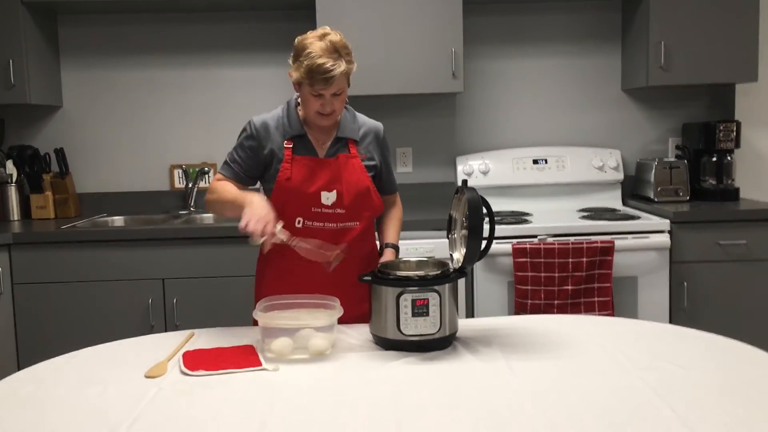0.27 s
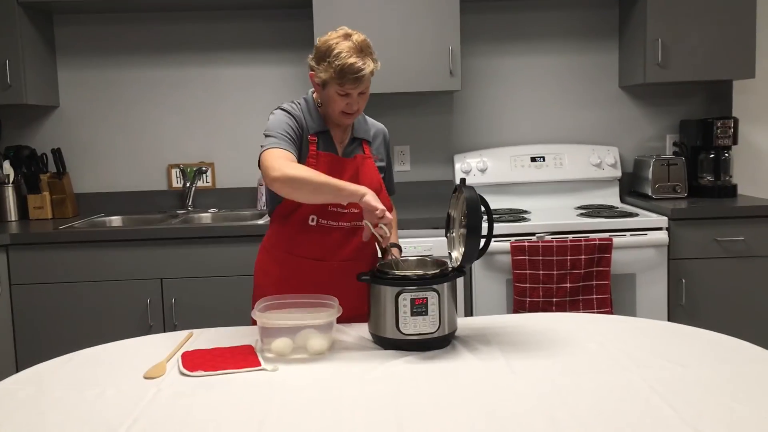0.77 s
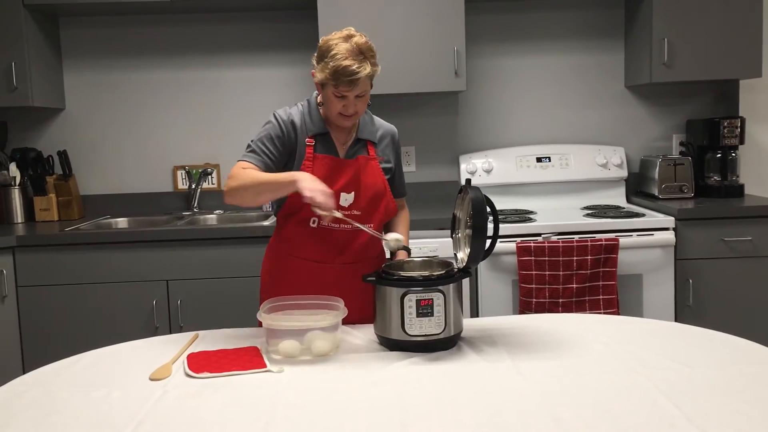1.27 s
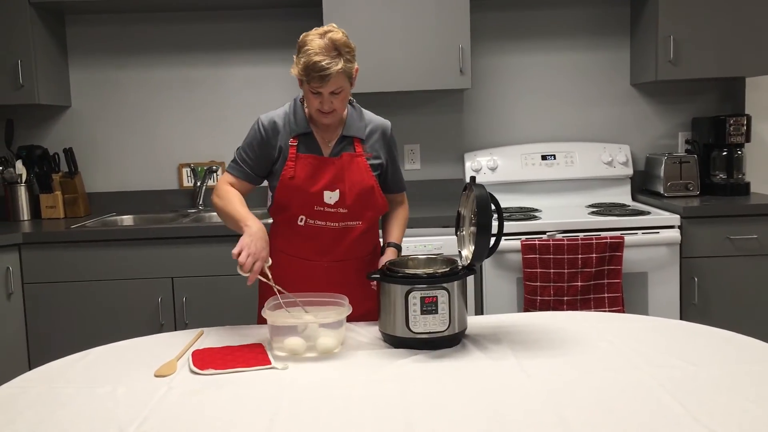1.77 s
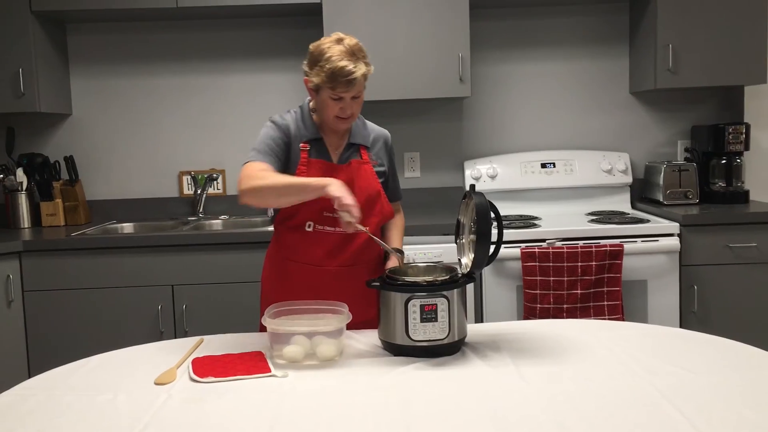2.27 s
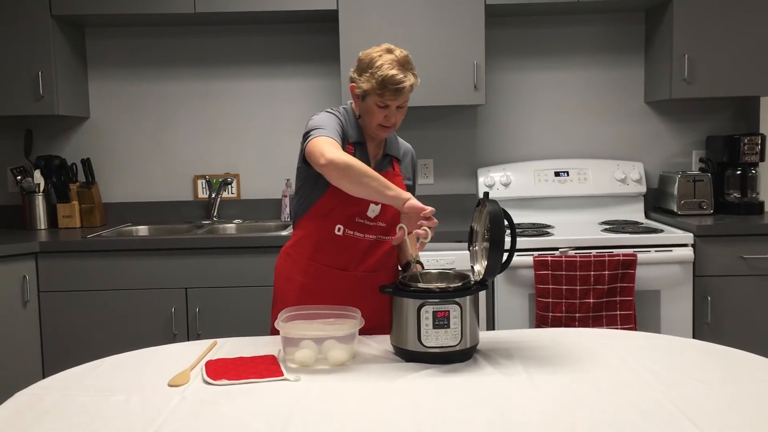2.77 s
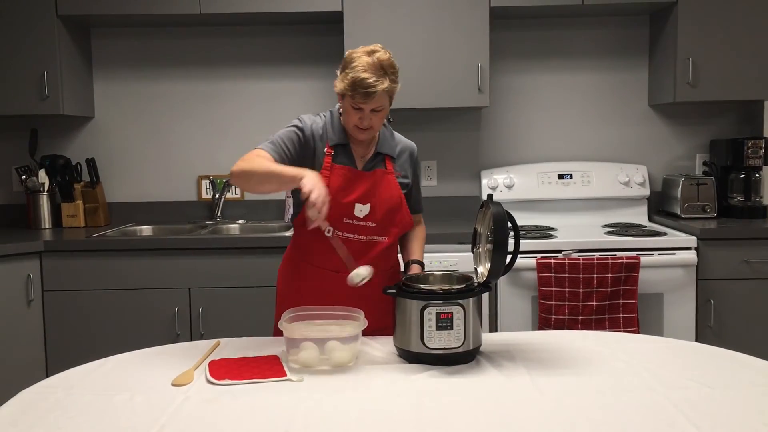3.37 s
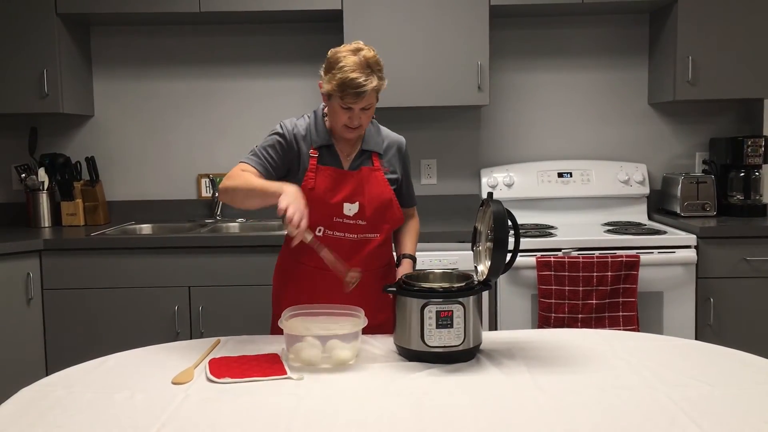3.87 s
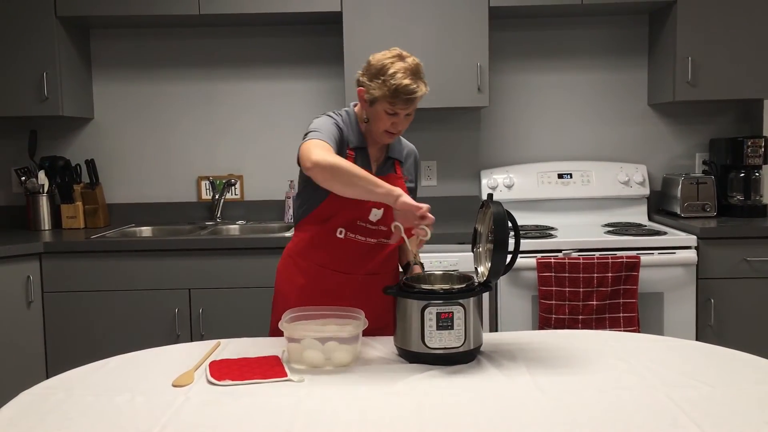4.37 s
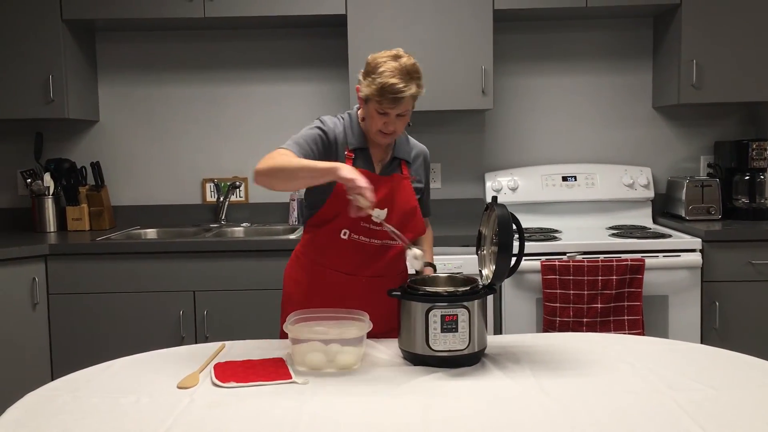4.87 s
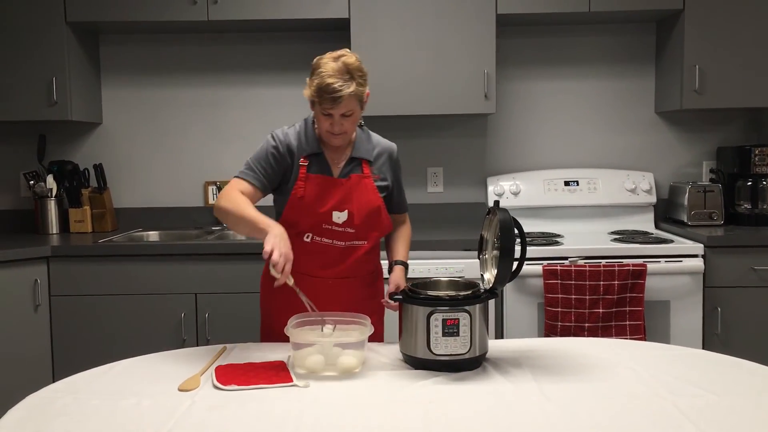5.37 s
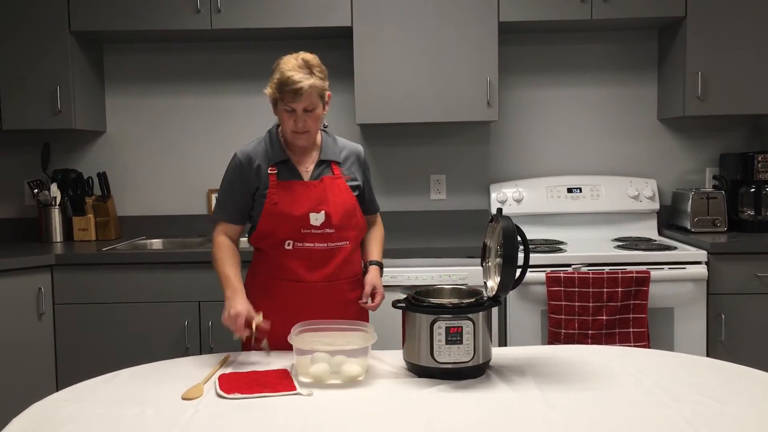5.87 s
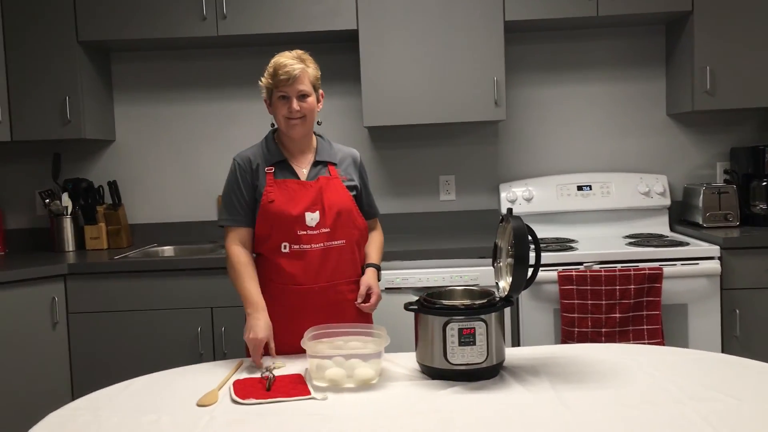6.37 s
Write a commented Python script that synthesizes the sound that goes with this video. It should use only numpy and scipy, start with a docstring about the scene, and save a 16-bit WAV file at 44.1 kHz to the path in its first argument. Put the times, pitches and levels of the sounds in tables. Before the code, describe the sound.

In a small kitchen, steel tongs scrape and clink against a thin metal pot, with faint squeaks as they grip eggs. Each egg lands in a plastic tub of water with a soft knock and a low thump from the table. After several transfers, the tongs snap shut with a loud, bright click and are set down with a knock and a brief rattle. Ventilation and appliances hum steadily underneath.

```python
"""A small humming kitchen: steel tongs lift boiled eggs from a pot into a plastic tub of cold water.
The tongs scrape and clink on the pot's thin wall, tick on the shells and squeak faintly as they grip.
Each egg knocks on the tub's floor and makes the table boom. At last the tongs snap shut and are
laid on the table with a knock and a rattle. Ventilation and appliance motors drone underneath."""
import sys
import numpy as np
from scipy import signal
from scipy.fft import rfft, irfft, next_fast_len
from scipy.io import wavfile

SR = 44100
rng = np.random.default_rng(int(sys.argv[2]) if len(sys.argv) > 2 else 0)


def log_audio(samples):
    """Write samples as a 16-bit WAV file to the path given in sys.argv[1]."""
    # one column per channel
    frames = np.atleast_2d(samples).T
    # limit to full scale, then quantise
    limited = np.clip(frames, -1, 1)
    pcm = np.round(limited * 32767).astype(np.int16)
    wavfile.write(sys.argv[1], SR, pcm)


N = 291942
SIZE = 32768  # samples in one contact sound
AGE = np.arange(SIZE) / SR  # seconds since the contact
HZ = np.fft.rfftfreq(SIZE, 1 / SR)

# the tongs landing and bouncing on the table: start_s, level_db
TABLE_KNOCKS = [(6.07, -42.5), (6.4601, -9), (6.4655, -26), (6.4808, -26), (6.4896, -21)]


def pot():
    """Tongs hit the pot and skid, tiny slips keeping it clanging, and once an egg knocks dully on the pot's
    floor; hard hits are brighter and ring more."""
    # hits, one cluster for each egg, the first a dull knock of an egg on the pot's floor: start_s, level_db,
    # skid_s, floor_ring_db
    hits = [(0.7392, -36.5, 0.0032, 9.5), (.747, -33, 0.025, 0.5), (0.825, -39, 0.019, -6),
            (.872, -41.5, 0.028, -8.5), (.933, -32, 0.0071, -3.5), (.962, -27.5, 0.0034, -2.5),
            (1.032, -28.5, 0.018, 0.5), (2.591, -50.5, 0.013, 8), (2.628, -55, 0.023, 10),
            (2.684, -19.5, 0.0041, -5), (2.695, -28.5, 0.02, 4.5), (2.845, -43, .02, 7.5),
            (2.879, -43.5, 0.014, 5.5), (3.007, -49.5, 0.011, 3.5), (4.461, -41.5, 0.024, 4.5)]
    # tone of the wall's dense clang: freq_hz, gain_db
    wall_eq = [(150, -12.5), (300, 2), (400, -17), (570, -4.5), (800, -10.5), (1900, -12), (2450, -3.5),
               (2850, -3.5), (3250, -3), (3750, -4), (4700, -4.5), (5600, 1.5), (6600, -5), (8600, 1),
               (11400, -8.5), (15500, -5.5)]
    # the pot's lasting modes: pitch_hz, level_db, t60_s
    modes = [(570, -9, .25), (975, -14, .4), (1310, -15, .25), (1490, -14, .3), (1733, -9, .35),
             (2912, -11, .3), (3165, -4, .2), (3381, -3, .22), (4307, -17, .3), (5469, 1, .2),
             (5588, -2, .18), (6072, -4, .24), (6950, -7, .25), (7165, 0, .17), (7430, 1, .16),
             (7842, -2, .17), (8200, 2, .16), (8970, 0, .17), (9421, -6, .18), (9835, -4, .15),
             (11335, -3, .13), (11482, 0, .15)]
    # where the pot's floor rings: freq_hz, share of floor_ring_db
    floor_shape = [(200, 0), (550, 1), (1600, 1.5), (2400, 1.05), (3500, 0.48), (6000, 0)]
    neutral_db, slips_per_s = -24.5, 1500  # a hit at the neutral level gets no treble tilt
    track = np.zeros(N)
    for start_s, level_db, skid_s, floor_ring_db in hits:
        force_db = level_db - neutral_db
        grip = (1 - fade(AGE, 0.45 * skid_s)) * fade(np.maximum(AGE - skid_s, 0), 0.041)
        slips = rng.standard_normal(SIZE) * (rng.random(SIZE) < slips_per_s / SR) * grip
        slips[0] = 3.2 * amp(0.4 * force_db)  # the first touch sharpens with force
        slip_tick = amp(-10) * packet(signal.unit_impulse(SIZE))
        wall = steel_wall(t60=0.054, count=1300) + slip_tick
        scrape = packet(colour(signal.fftconvolve(slips, wall)[:SIZE], along(wall_eq, HZ)))
        clang = scrape + amp(-10 + 0.16 * force_db) * ring(modes)
        contact_db = tilt(0.16 * force_db, pivot_hz=8200) + floor_ring_db * along(floor_shape, HZ)
        gain = amp(level_db + 0.5) * np.sqrt(1 + skid_s / 0.0032)  # longer skids carry more energy
        add(track, start_s, gain * kitchen(colour(clang, contact_db), wet_db=-4.5))
    return track


def steel_wall(t60, count):
    """Thin steel rings in a crowd of overlapping modes at random pitches and strengths."""
    lines = np.zeros(len(HZ), complex)
    strengths = rng.standard_normal(count) * np.exp(2j * np.pi * rng.random(count))
    lines[rng.integers(1, len(HZ), count)] = strengths
    return packet(irfft(lines) * fade(AGE, t60))


def eggs():
    """An egg ticks and knocks on the tub's floor; the weight of the water then rocks the table top."""
    # eggs landing: start_s, level_db, table_boom_db, tub_ring_db
    drops = [(0.3825, -34, -41.5, -5), (2.1773, -35, -38.5, -3), (3.902, -41.5, -55, -6),
             (3.963, -31, -41.5, -12), (5.653, -32.5, -36, -1.5)]
    # tone of the water-filled tub: freq_hz, gain_db
    tub_eq = [(100, -25), (250, 3), (450, -1), (680, 6.5), (1000, 1), (1500, -1.5), (2200, -9),
              (3000, -16.5), (4000, -21), (8000, -28), (15000, -49)]
    # the tub's modes: pitch_hz, level_db, t60_s
    modes = [(295, -3, .2), (660, 0, .2), (904, -5, .14), (1220, -9, .12), (1420, -8, .1)]
    tick_eq = [(800, -15), (4200, 6), (6000, -4), (14000, -18)]  # freq_hz, gain_db
    boom = np.sin(2 * np.pi * 82 * AGE) * fade(AGE, 0.37) * (1 - fade(AGE, 0.16)) ** 2
    track = np.zeros(N)
    for start_s, level_db, boom_db, ring_db in drops:
        tick = amp(-17.5) * impact(along(tick_eq, HZ), shudder_db=-1, t60=0.0083)
        knock = impact(along(tub_eq, HZ), shudder_db=9, t60=0.075) + amp(ring_db) * ring(modes)
        landing = amp(level_db + 4.5) * kitchen(tick + knock, wet_db=-9)
        add(track, start_s, landing + amp(boom_db + 10.5) * boom)
    return track


def tongs():
    """Squeezed by the hand or jolted by the table, the steel arms click: the harder, the brighter."""
    # the arms closing; the loud pair is the snap and its rebound: start_s, level_db
    clicks = [(1.929, -41.5), (4.901, -39), (4.94, -41), (5.643, -42), (5.8167, -8), (5.819, -14.5),
              (6.0953, -38.5), (6.411, -37.5), (6.4902, -28.5)]
    # tone of the thin steel arms: freq_hz, gain_db
    arm_eq = [(300, -19), (1500, -22.5), (2700, -17), (4200, -12), (5200, -17), (6300, -2.5), (7400, -8.5),
              (8700, -2), (10400, -10), (12000, 0.5), (14800, 11), (15700, 17.5), (16500, -27)]
    # the arms' modes: pitch_hz, level_db, t60_s
    modes = [(2767, -9, .2), (4576, -16, .16), (6105, -9, .17), (6690, -4, .16), (8500, -8, .15),
             (9415, -9, .18), (11800, -4, .17), (12380, -2, .2), (13250, 1, .22), (14200, -2, .19),
             (14590, -1, .18), (14988, 4, .22)]
    neutral_db = -8.5  # a click at this level gets no treble tilt
    # the arms clap together just after each knock on the table
    claps = [(knock_s + 0.0065, -20 + 0.49 * knock_db) for knock_s, knock_db in TABLE_KNOCKS]
    track = np.zeros(N)
    for start_s, level_db in clicks + claps:
        tone_db = along(arm_eq, HZ) + tilt(0.24 * (level_db - neutral_db), pivot_hz=12000)
        click = impact(tone_db, shudder_db=3, t60=0.036) + amp(-18) * ring(modes)
        add(track, start_s, amp(level_db + 0.5) * kitchen(click, wet_db=-8))
    return track


def table():
    """The handle of the tongs knocks on the covered table and bounces."""
    # tone of the table top: freq_hz, gain_db
    top_eq = [(35, -53), (90, -25), (180, -17), (350, -13), (560, -27), (760, -15), (930, 0.5), (1400, -1),
              (1750, -9.5), (2300, -17.5), (3100, -22), (4200, -37), (5500, -45), (12000, -50)]
    # the top's modes: pitch_hz, level_db, t60_s
    modes = [(100, -19, .35), (183, -7, .28), (290, -9, .22), (400, -14, .35), (660, -7, .25),
             (921, 1, .14), (1155, -7, .15), (1214, -3, .13), (1310, -1, .13), (1404, 1, .12),
             (1810, -14, .17)]
    track = np.zeros(N)
    for start_s, level_db in TABLE_KNOCKS:
        knock = impact(along(top_eq, HZ), shudder_db=-5, t60=0.06)
        body = amp(-7) * ring(modes, scatter_db=0)
        add(track, start_s, amp(level_db) * kitchen(knock + body, wet_db=-15))
    return track


def shell_grip():
    """Steel ticks on the shells and squeaks faintly under the grip."""
    # light taps on eggshell: start_s, level_db, pitch_hz
    taps = [(.233, -49.5, 3580), (3.669, -56, 3400), (3.807, -43.5, 3240), (3.810, -49, 3680),
            (5.06, -52, 4520)]
    # squeaks as an egg is gripped or carried: start_s, length_s, level_db, pitch_hz
    squeaks = [(0.744, 0.044, -31, 3250), (.83, 0.11, -42, 3165), (1.593, .06, -54, 1120),
               (3.234, 0.09, -54.5, 1116), (3.827, 0.059, -50, 1097), (4.943, 0.049, -43, 1110)]
    tick_eq = [(1000, -6), (4000, 6), (12000, -23)]  # freq_hz, gain_db
    track = np.zeros(N)
    for start_s, level_db, pitch_hz in taps:
        tick = impact(along(tick_eq, HZ), shudder_db=22, t60=0.0067)
        ping = ring([(pitch_hz, 0, 0.04)])
        add(track, start_s, amp(level_db) * kitchen(tick + ping, wet_db=-9.5))
    for start_s, length_s, level_db, pitch_hz in squeaks:
        swell = np.sin(np.pi * np.minimum(AGE / length_s, 1))
        phase_drift = 0.053 * np.cumsum(rng.standard_normal(SIZE))
        squeak = swell * np.sin(2 * np.pi * pitch_hz * AGE + phase_drift)
        add(track, start_s, amp(level_db) * kitchen(squeak, wet_db=-15))
    return track


def kitchen(x, wet_db):
    """Add the room's short reverb, new for every place of contact; the treble dies first."""
    # reverb time: freq_hz, t60_s
    decay = [(100, 1), (500, 0.34), (2000, 0.36), (7000, 0.24), (14000, 0.2)]
    hz, t, noise = signal.stft(rng.standard_normal(SIZE), SR, nperseg=256)
    dying = noise * fade(t, along(decay, hz)[:, None])
    tail = signal.istft(dying, SR, nperseg=256)[1][:SIZE] * (1 - fade(AGE, 0.039))
    return x + amp(wet_db) * signal.fftconvolve(x, tail / np.linalg.norm(tail))[:SIZE]


def room_tone():
    """Ventilation noise and the slightly wandering hum of appliance motors."""
    # tone of the ventilation and hiss: freq_hz, gain_db
    air_eq = [(15, -55), (25, -11), (50, -7), (80, -7.5), (123, -3), (157, -14), (211, -3.5), (342, -14),
              (414, -12), (449, -20), (1040, -23), (1120, -22), (1590, -28), (12400, -40.5), (15800, -29)]
    # motor tones: pitch_hz, level_db, width_hz, noise_share
    motors = [(118.2, -53, 1.4, 0.46), (131.8, -55.5, 3.7, 1), (207.2, -56, 3.16, 0.48),
              (539, -69, 2.3, 0.16), (708, -68, 0.7, 0.14), (898, -69, 2.8, 0.42), (1305, -73, 1.1, .2),
              (3563, -71.5, 28, 0.19), (6010, -75, 39, 0.46)]
    hz, t = np.fft.rfftfreq(N, 1 / SR), np.arange(N) / SR
    track = amp(-46) * shaped_noise(amp(along(air_eq, hz)))
    for pitch_hz, level_db, width_hz, noise_share in motors:
        waver = shaped_noise(1 / (1 + ((hz - pitch_hz) / (2 * width_hz)) ** 2))
        phase_drift = np.cumsum(rng.standard_normal(N)) * np.sqrt(width_hz / SR)
        hum = unit(np.sin(2 * np.pi * pitch_hz * t + phase_drift))
        track += amp(level_db) * (np.sqrt(noise_share) * waver + np.sqrt(1 - noise_share) * hum)
    return track


def impact(gain_db, shudder_db, t60):
    """One sharp push and the short shudder of many crowded modes."""
    push = packet(signal.unit_impulse(SIZE))
    shudder = packet(rng.standard_normal(SIZE) * fade(AGE, t60) * (1 - fade(AGE, 0.0023)))
    return packet(colour(push + amp(shudder_db) * shudder, gain_db))


def ring(modes, scatter_db=2):
    """Damped modes, struck at random phases with their levels scattered by scatter_db."""
    hz, db, t60 = np.transpose(modes)[:, :, None]
    gains = amp(db + scatter_db * rng.standard_normal(hz.shape))
    partials = gains * fade(AGE, t60) * np.sin(2 * np.pi * (hz * AGE + rng.random(hz.shape)))
    return packet(partials.sum(axis=0) * (1 - fade(AGE, 0.021)))


def colour(x, gain_db):
    """Minimum-phase EQ with the given gain at each of HZ."""
    cepstrum = irfft(np.log(amp(gain_db)))
    cepstrum[1:SIZE // 2] *= 2
    cepstrum[SIZE // 2 + 1:] = 0
    return signal.fftconvolve(x, irfft(np.exp(rfft(cepstrum))))[:SIZE]


def tilt(db_per_octave, pivot_hz):
    """Brightness tilt in dB, flat below 300 Hz."""
    return db_per_octave * np.log2(np.maximum(HZ, 300) / pivot_hz)


def shaped_noise(gains):
    """A scene-long bed of noise with the given spectrum, at rms 1."""
    return unit(irfft(rfft(rng.standard_normal(N)) * gains, N))


def along(points, hz):
    """Join (freq_hz, value) points on a log frequency axis."""
    freqs, values = np.transpose(points)
    return np.interp(np.log(hz + 1), np.log(freqs), values)


def fade(t, t60):
    """Exponential decay, 60 dB in t60 seconds; 1 - fade makes an attack."""
    return amp(-60 * t / np.maximum(t60, 1e-3))


def amp(db):
    """Decibels to gain."""
    return 10 ** (np.asarray(db) / 20)


def unit(x):
    """Scale to rms 1."""
    return x / np.sqrt(np.mean(np.abs(x) ** 2) + 1e-20)


def packet(x):
    """Scale to the energy of 4 ms at rms 1."""
    return x / np.linalg.norm(x) * np.sqrt(0.004 * SR)


def add(track, start_s, sound):
    """Mix a sound into the track at start_s."""
    start = max(round(start_s * SR), 0)
    track[start:start + len(sound)] += sound[:N - start]


def scene():
    """All sources in mono, at one microphone."""
    return (room_tone() + pot() + eggs() + tongs() + shell_grip() + table())[None]


def record(dry):
    """The microphone's housing cuts two narrow notches; nothing passes above the band limit."""
    # microphone response: freq_hz, gain_db
    mic_eq = [(15, -24), (28, -22), (42, 1), (4450, -2.5), (4900, -5), (5500, -1), (7000, 1.5),
              (7700, -1.5), (8400, 1.5), (9900, 2.5), (10400, -2.5), (11000, 4), (12200, 4.5), (15800, -10)]
    top_hz = 15850
    size = next_fast_len(N + SIZE)
    hz = np.fft.rfftfreq(size, 1 / SR)
    response = amp(along(mic_eq, hz)) * (hz < top_hz)
    return irfft(rfft(dry, size) * response, size)[:, :N]


dry = scene()
out = record(dry)
log_audio(out)
```